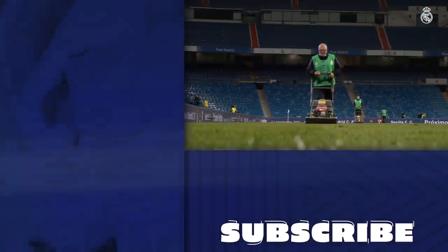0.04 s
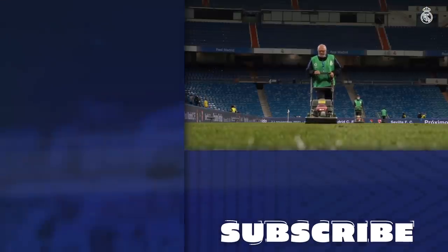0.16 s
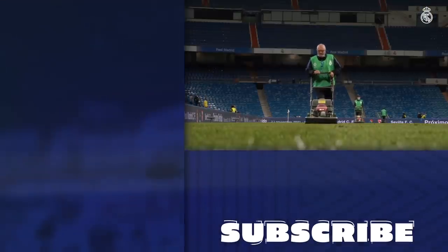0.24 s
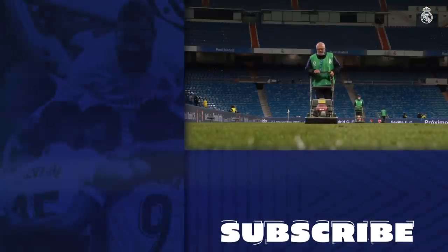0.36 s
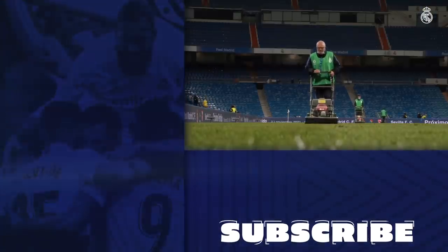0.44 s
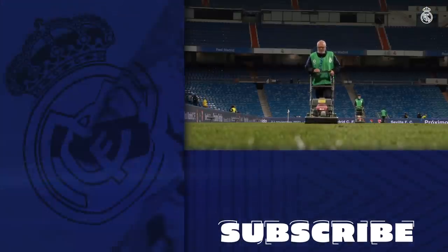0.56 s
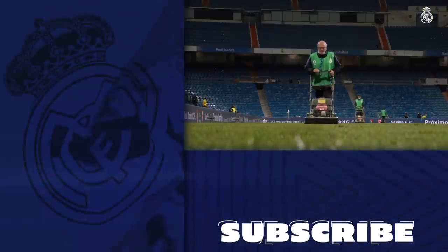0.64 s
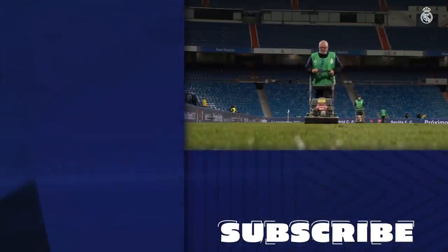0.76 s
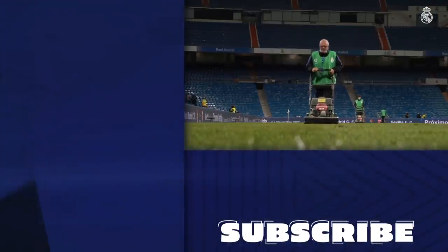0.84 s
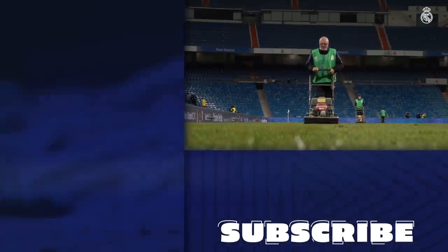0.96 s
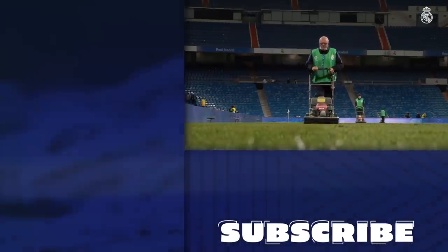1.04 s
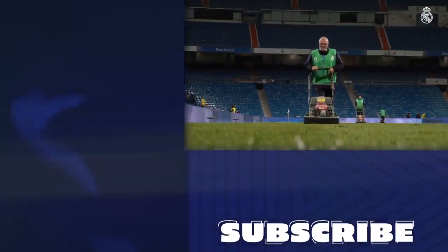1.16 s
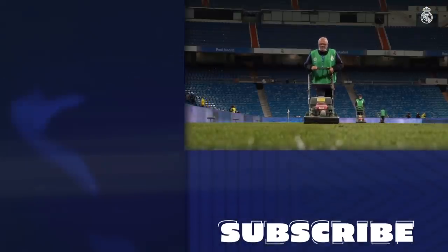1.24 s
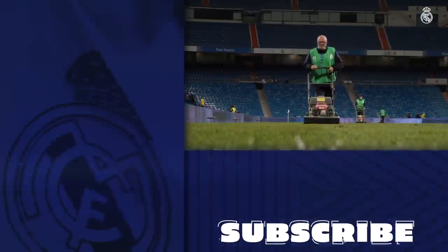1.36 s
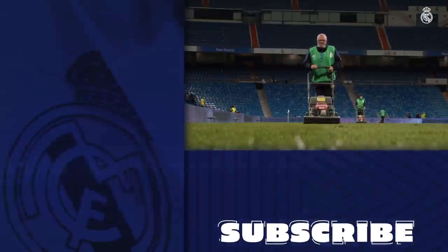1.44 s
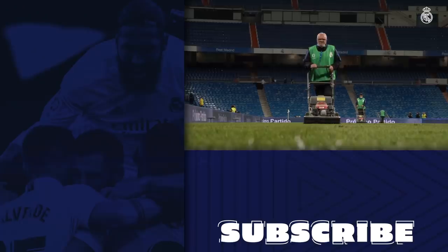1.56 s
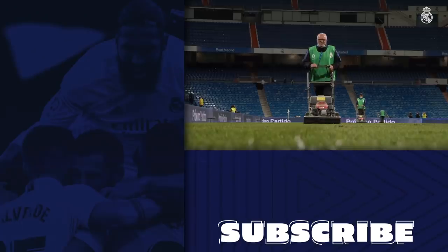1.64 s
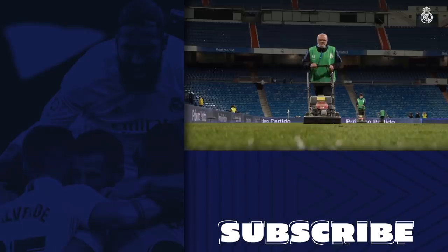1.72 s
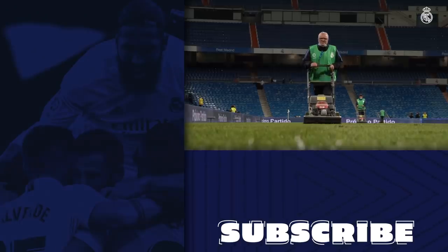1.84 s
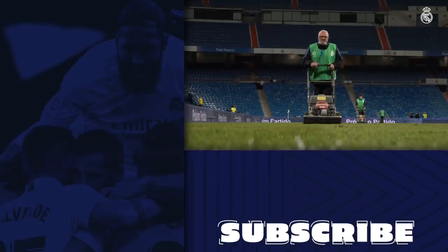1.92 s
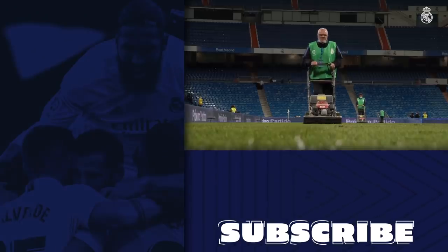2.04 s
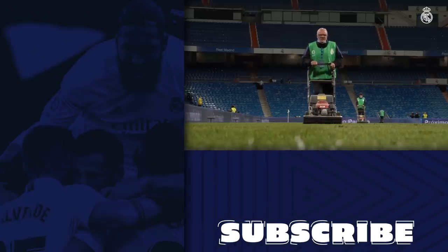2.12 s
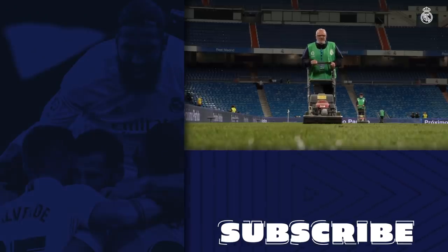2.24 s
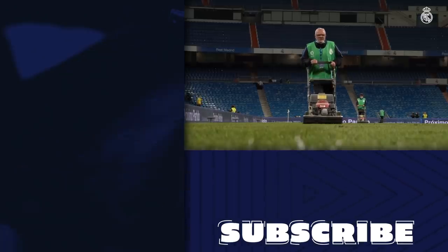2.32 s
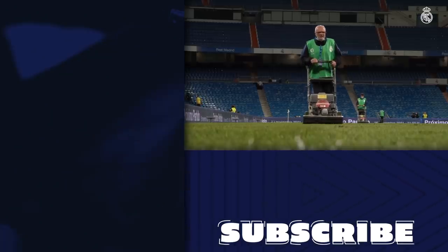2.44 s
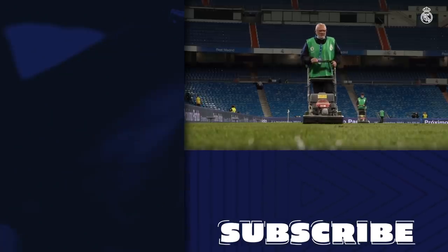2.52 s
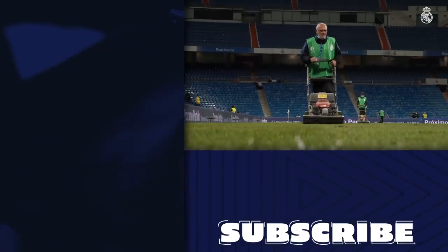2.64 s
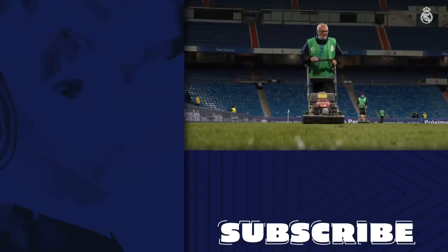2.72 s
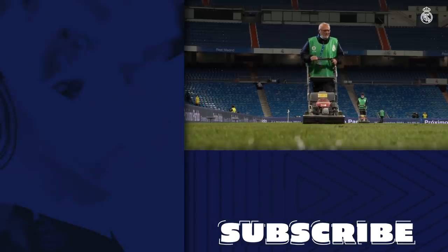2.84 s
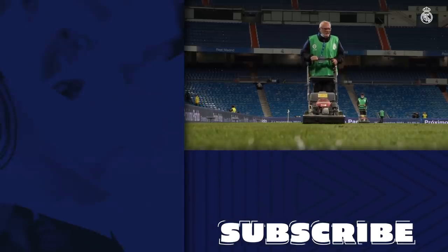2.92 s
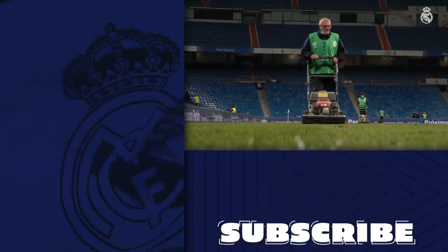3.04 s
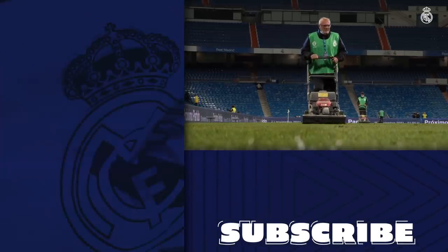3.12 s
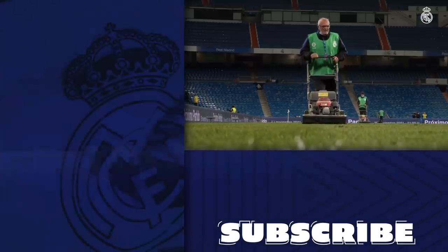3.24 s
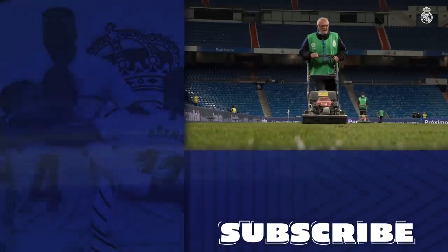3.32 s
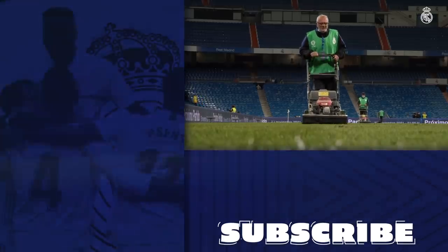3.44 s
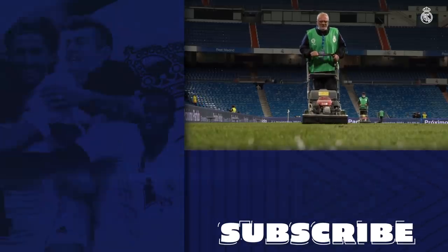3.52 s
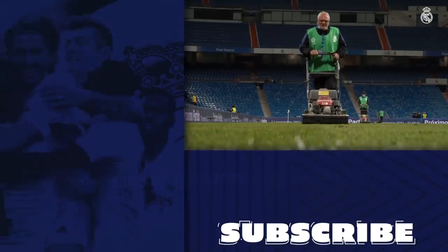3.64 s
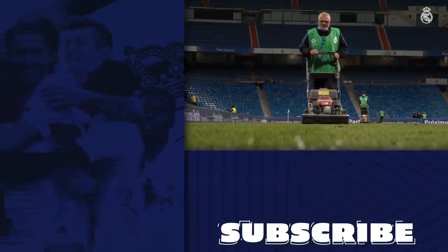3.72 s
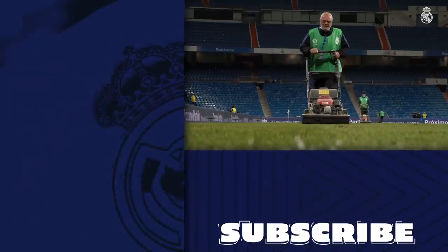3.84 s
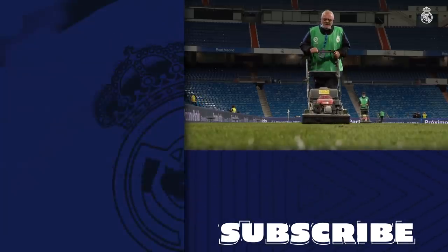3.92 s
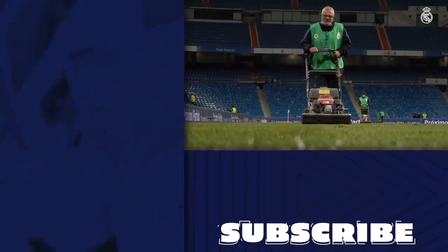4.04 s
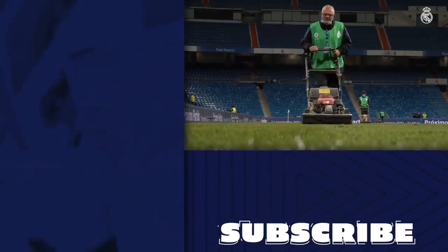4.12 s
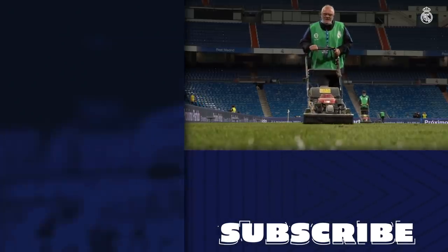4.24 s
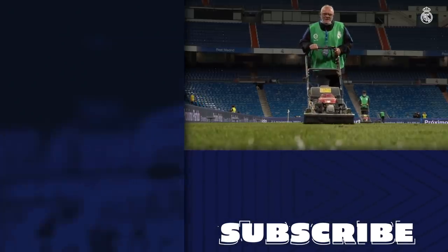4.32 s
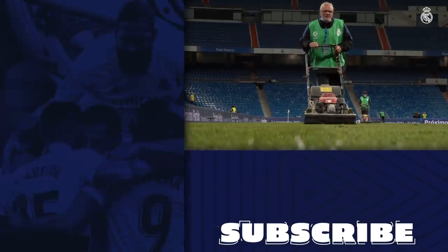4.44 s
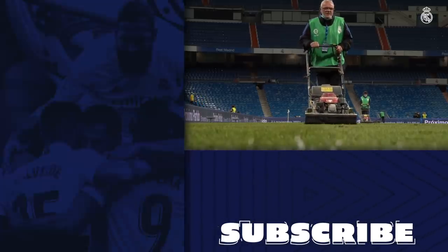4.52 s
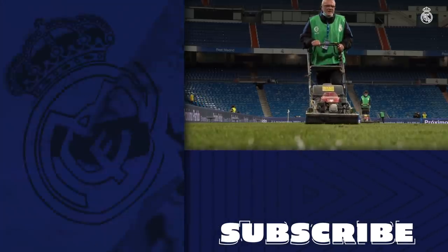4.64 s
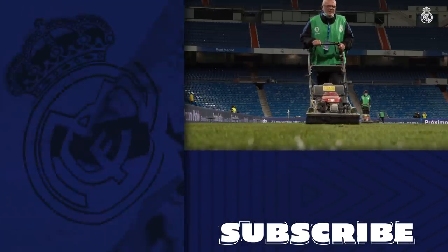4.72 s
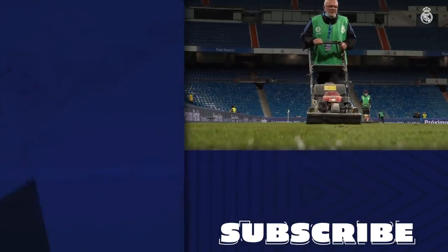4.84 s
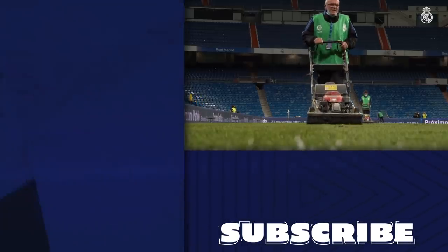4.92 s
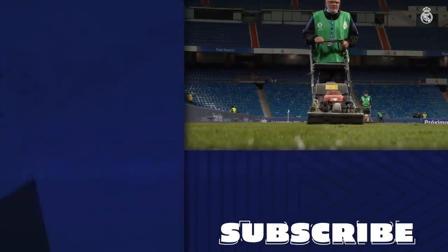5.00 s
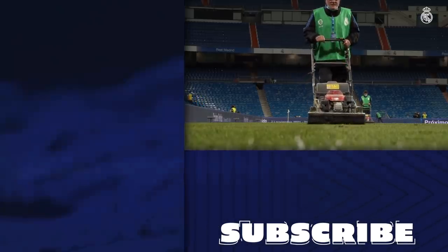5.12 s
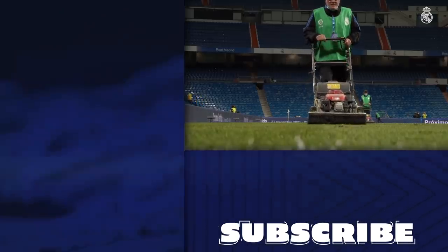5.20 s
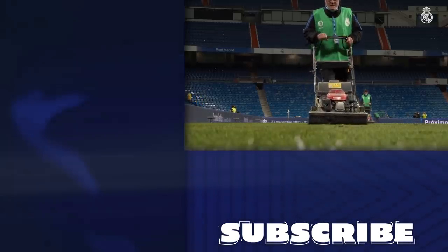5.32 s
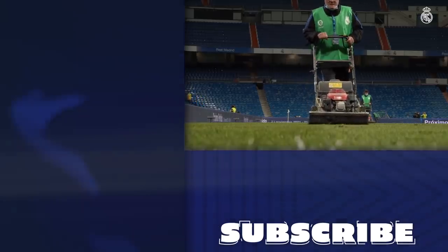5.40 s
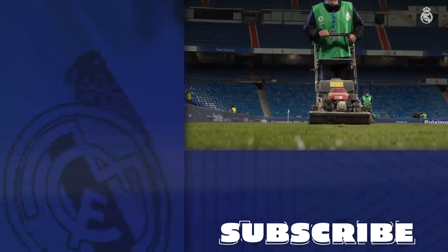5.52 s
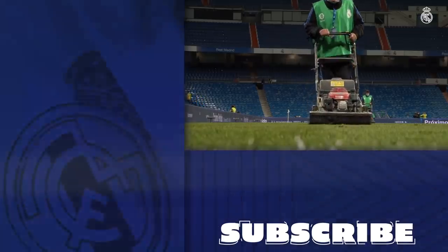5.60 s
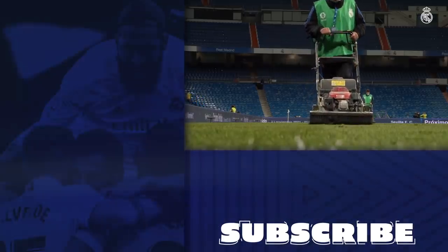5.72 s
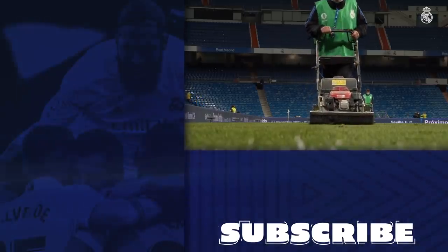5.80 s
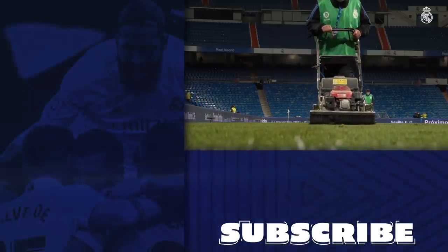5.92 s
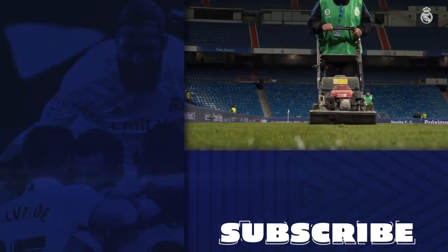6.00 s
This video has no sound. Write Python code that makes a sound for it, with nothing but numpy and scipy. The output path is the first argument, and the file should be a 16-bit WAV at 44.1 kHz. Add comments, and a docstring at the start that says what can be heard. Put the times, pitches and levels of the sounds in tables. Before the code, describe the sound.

A small one-cylinder lawn mower putters steadily across grass in a big empty stadium, slowly coming closer, with other mowers droning faintly far behind.

```python
"""A walk-behind mower with a one-cylinder four-stroke engine comes slowly nearer across the grass of an empty stadium.
Each firing sends a puff through the ringing muffler and a crack that washes off the seats; echoes from the stands
slide against the direct sound, so the low notes swell and fade.
Valves tick, gears whine in drifting tones, and shaped noise makes the rasp, the blade whir, the grass hiss and the fan.
Behind it, sine tones with slowly wandering level and pitch are the far mowers, over a low rumble."""
import sys
import numpy as np
from scipy import signal
from scipy.fft import rfft, irfft, next_fast_len
from scipy.io import wavfile

SR = 44100
rng = np.random.default_rng(int(sys.argv[2]) if len(sys.argv) > 2 else 0)


def to_wav(s):
    """Save 16-bit WAV."""
    ch = np.atleast_2d(s).T  # columns
    pcm = np.round(np.clip(ch, -1, 1) * 32767)  # PCM
    wavfile.write(sys.argv[1], SR, pcm.astype(np.int16))


N = 267378
LEAD = SR  # samples of running engine before the scene is heard
TIME = np.arange(-LEAD, N) / SR  # s
FIRING_HZ = 30.66  # typical firing rate
START_M, WALK_M_S, SOUND_M_S = 6.3, .56, 343  # distance at 0 s, walking speed, speed of sound
NEARNESS = START_M / (START_M - WALK_M_S * TIME)  # direct sound grows as one over the distance


def from_db(db):
    """Decibels to gain."""
    return 10 ** (np.asarray(db) / 20)


def rms_one(x):
    """Scale to rms 1."""
    return x / np.sqrt(np.mean(x ** 2) + 1e-20)


def approach(start_db, power):
    """Gain as the mower nears: power 1 for direct sound, less for echoes, more for sound the grass swallows."""
    return from_db(start_db) * NEARNESS ** power


def colour(x, spectrum):
    """Give x the shape of a spectrum, with sloping skirts beyond its ends; rms 1."""
    size = next_fast_len(len(x))
    hz, db = np.transpose(spectrum)
    log_hz = np.log(np.arange(size // 2 + 1) * SR / size + 1)
    beyond = np.abs(log_hz - np.clip(log_hz, np.log(hz[0]), np.log(hz[-1])))
    gain = from_db(np.interp(log_hz, np.log(hz), db) - 20 * beyond)
    return rms_one(irfft(rfft(x, size) * gain, size)[:len(x)])


def noise(spectrum):
    """Coloured noise, rms 1."""
    return colour(rng.standard_normal(len(TIME)), spectrum)


def drift(rate_hz):
    """Slow random wander with spread 1: smoothed noise drawn every 100 samples."""
    r = np.exp(-200 * np.pi * rate_hz / SR)
    chance = rng.standard_normal(len(TIME) // 100 + 2002)
    slow = signal.lfilter([1], [1, -2 * r, r * r], chance)[2000:]  # skip the settling
    return np.interp(np.arange(len(TIME)) / 100, np.arange(len(slow)), rms_one(slow))


def resonance(x, hz, width_hz):
    """Two-pole band-pass with gain 1 on top."""
    r = np.exp(-np.pi * width_hz / SR)
    feed = np.array([1, 0, -1]) * (1 - r * r) / 2
    back = [1, -2 * r * np.cos(2 * np.pi * hz / SR), r * r]
    return signal.lfilter(feed, back, x + 1e-18)


def strokes(cycles, place, uneven_db, jitter_s):
    """One click each firing cycle at the given place, uneven in strength and timing."""
    at = np.flatnonzero(np.diff(np.floor(cycles - place)) > 0)
    chance = rng.standard_normal((256, 2))[:len(at)]
    shift = (chance[:, 0] * jitter_s * SR).astype(int)
    clicks = np.zeros(len(TIME))
    clicks[np.clip(at + shift, 0, len(TIME) - 1)] = from_db(uneven_db * chance[:, 1])
    return clicks


def bursts(clicks, decay_s):
    """Each click starts an envelope that dies away exponentially."""
    return signal.lfilter([1], [1, -np.exp(-1 / (decay_s * SR))], clicks + 1e-18)


def seat_rows(x, t60_s):
    """Countless small reflections from the seats blur x into a wash; rms 1."""
    tail = rng.standard_normal(LEAD) * from_db(-60 * np.arange(LEAD) / SR / t60_s)
    return rms_one(signal.fftconvolve(x, tail)[:len(x)])


# low spectrum of the stadium: freq_hz, level_db
RUMBLE_SPECTRUM = [(15, -28), (28, 9.5), (42, -5), (56, 14), (80, 11), (130, 13.5), (210, 17), (300, 14.5),
                   (400, 10.5), (600, 7.5), (1500, -9.5)]


def rumble():
    """Low noise under everything, shaped by its spectrum."""
    return noise(RUMBLE_SPECTRUM)


# exhaust tones of the far mowers: firing_hz, multiple of the firing rate, level_db
FAR_TONES = [(32.98, 2, -44.5), (32.77, 4, -33), (32.4, 5, -58), (33.13, 6, -37.5), (32.83, 7, -35.5),
             (32.83, 12, -36.5), (34.9, 4, -38), (33.3, 5, -54), (33.74, 6, -59)]


def far_mowers():
    """Only the low exhaust notes carry across the pitch: sines wandering in level and phase."""
    drone = 0
    for firing_hz, multiple, level_db in FAR_TONES:
        level = from_db(level_db + 0.45 * drift(1.0))
        phase = 2 * np.pi * (multiple * firing_hz * TIME + rng.random()) + 0.7 * drift(0.33)
        drone = drone + level * np.sqrt(2) * np.sin(phase)
    return drone


# airy spectrum of the fan: freq_hz, level_db
FAN_SPECTRUM = [(2000, -24), (2700, 4.5), (3400, 7.5), (3880, 8.5), (4300, -11), (5000, -4), (8000, -5.5)]


def fan():
    """Steady air noise, strongest around 3 to 4 kHz."""
    return noise(FAN_SPECTRUM)


# spectrum of a swish through the grass: freq_hz, level_db
SWISH_SPECTRUM = [(2500, -7), (4500, -3), (6000, 5), (8000, -4), (11000, -20)]


def swish(at_s, width_s):
    """One brief brighter swish through the grass: noise under a bell-shaped envelope."""
    return np.exp(-.5 * ((TIME - at_s) / width_s) ** 2) * noise(SWISH_SPECTRUM)


# spectrum of the whirring blades: freq_hz, level_db
WHIR_SPECTRUM = [(1200, 6.5), (1750, 8), (1980, 9), (2300, -4.5), (2800, -15.5), (3600, -6), (5000, -18.5)]
# spectrum of the cut grass: freq_hz, level_db
HISS_SPECTRUM = [(2500, -10), (4500, 1), (6000, 0), (8000, -1.5), (9600, -3.5), (10500, -2), (12000, -7),
                 (15500, -12.5)]
# level the hiss settles towards, how far below that it is at 0 s, and how fast it emerges
HISS_NEAR_DB, HISS_LOST_DB, HISS_EMERGES_S = -55.5, 27, 1.52


def cutter():
    """The blades whir louder with every step; the hiss of cut grass emerges and levels off, with one swish."""
    whir = approach(start_db=-49.5, power=1.94) * noise(WHIR_SPECTRUM)
    hiss_db = HISS_NEAR_DB - HISS_LOST_DB * np.exp(-TIME / HISS_EMERGES_S)
    hiss = from_db(hiss_db) * noise(HISS_SPECTRUM)
    return whir + hiss + from_db(-56.5) * swish(at_s=2.63, width_s=0.085)


# spectrum of the close rasp: freq_hz, level_db
RASP_SPECTRUM = [(1600, -26), (2150, 6), (2450, 1), (2900, -5), (3500, -18), (5000, -20)]


def rasp(cycles):
    """Rough mechanical noise that pulses with the firings and only carries a short way."""
    shaking = bursts(strokes(cycles, place=.01, uneven_db=2.5, jitter_s=.0003), decay_s=.03)
    return colour(shaking * rng.standard_normal(len(TIME)), RASP_SPECTRUM)


# valve train contacts: place in the cycle (0-1), relative_level_db, decay_s
VALVE_CONTACTS = [(.012, 3, .003), (.214, -9, .0015), (.297, 1, .0015), (.342, -3, .0035), (.591, -2, .001)]
# bright spectrum of the ticks: freq_hz, level_db
TICK_SPECTRUM = [(1500, -10), (3500, 1), (6000, -1), (9000, -1), (10700, .5), (13000, -2.5), (15500, -5.5)]


def valves(cycles):
    """Metal contacts at fixed places in the cycle: bright ticks of decaying noise."""
    envelope = 0
    for place, level_db, decay_s in VALVE_CONTACTS:
        contacts = strokes(cycles, place, uneven_db=3.6, jitter_s=.00012)
        envelope = envelope + from_db(level_db) * bursts(contacts, decay_s)
    return colour(envelope * rng.standard_normal(len(TIME)), TICK_SPECTRUM)


# whine of the drive: multiple of the firing rate, relative_level_db
WHINE_TONES = [(16, -16), (18, -15.5), (20, -14.5), (23, -15), (24, -10.5), (26, -15), (28, -13.5),
               (34, -12.5), (37, -17.5), (38, -20.5), (48, -16), (51, -14.5), (82, -53), (126, -36.5)]
WHINE_FADES_HZ, WHINE_STEADY_SHARE = 1.84, .22  # rate of fading, direct share of the power


def whine(cycles):
    """Gear tones locked to the crank: a steady direct part plus scattered echoes that drift, so each tone fades."""
    tones = 0
    for multiple, level_db in WHINE_TONES:
        scattered = drift(WHINE_FADES_HZ) + 1j * drift(WHINE_FADES_HZ)
        paths = np.sqrt(2 * WHINE_STEADY_SHARE) + np.sqrt(1 - WHINE_STEADY_SHARE) * scattered
        turning = np.exp(2j * np.pi * (multiple * cycles + rng.random()))
        tones = tones + from_db(level_db) * np.real(paths * turning)
    return tones


# spectrum of the crack and rattle: freq_hz, level_db
CLATTER_SPECTRUM = [(250, 2), (420, -2), (680, 3.5), (900, 0), (1130, 3), (1320, -1.5), (1540, -4.5),
                    (1720, -12), (2200, -56), (3000, -28), (4200, -28), (5500, -59)]


def clatter(cycles):
    """The sharp crack of each firing, a rattle of the deck around it, and the crack's wash from the seats."""
    crack = colour(-strokes(cycles, place=.021, uneven_db=1.7, jitter_s=.00008), CLATTER_SPECTRUM)
    shaking = bursts(strokes(cycles, place=.97, uneven_db=1.8, jitter_s=.0002), decay_s=.021)
    rattle = colour(shaking * rng.standard_normal(len(TIME)), CLATTER_SPECTRUM)
    wash = seat_rows(crack, t60_s=2.03)
    return from_db(-9.0) * crack + from_db(-3.5) * rattle + from_db(-6.5) * wash


# slow swell of the boom: dB above and below the middle, period, time of a crest
SWELL_DB, SWELL_EVERY_S, SWELL_CREST_S = 2, 2.38, 3.5


def boom(cycles):
    """Fourth multiple of the firing rate, as an echo whose extra path grows at twice the walking speed."""
    swell = from_db(SWELL_DB * np.cos(2 * np.pi * (TIME - SWELL_CREST_S) / SWELL_EVERY_S))
    delay_s = .043 + 2 * WALK_M_S * TIME / SOUND_M_S
    late_cycles = cycles - FIRING_HZ * delay_s
    return swell * np.cos(2 * np.pi * 4 * late_cycles)


# muffler resonances: freq_hz, width_hz, level_db
MUFFLER_MODES = [(61.5, 3, -53), (154, 5.2, -35.5), (193.6, 29.5, -27), (272.8, 13.3, -35),
                 (304.4, 3.5, -35), (368.1, 8.9, -36.5), (598, 193, -50)]
# echoes from the stands: delay_s at 0 s, growth of the extra path in m/s, level_db
STAND_ECHOES = [(.04549, 1.119, -2.2), (.07433, .404, -5.2), (.09394, .01, -9), (.12702, 1.122, -2.2),
                (.15146, 1.122, -1.9), (.16778, 1.114, -1.9), (.21019, 0, -5.9)]


def exhaust(cycles):
    """Soft-edged puffs ring the muffler; the direct sound grows while the echoes slide later or stay put."""
    puffs = -strokes(cycles, place=.018, uneven_db=.6, jitter_s=.00006) * SR / (2 * FIRING_HZ)
    puffs = signal.sosfilt(signal.butter(4, 540, fs=SR, output="sos"), puffs)  # soften the edges
    note = sum(from_db(level_db) * resonance(puffs, hz, width_hz) for hz, width_hz, level_db in MUFFLER_MODES)
    echoes = 0
    for delay_s, growth_m_s, level_db in STAND_ECHOES:
        heard_from = TIME - delay_s - growth_m_s * TIME / SOUND_M_S
        echoes = echoes + from_db(level_db) * np.interp(heard_from, TIME, note)
    return NEARNESS * note + echoes


# nearly steady engine speed: time_s, firing_hz
ENGINE_SPEED = [(0.0, 30.588), (0.71, 30.75), (1.0, 30.658), (2.2, 30.614), (3.32, 30.75), (3.52, 30.666),
                (4.25, 30.792), (5.76, 30.458), (6.06, 30.642)]


def engine_cycles():
    """Add up the firing rate into a running count of firing cycles."""
    time_s, firing_hz = np.transpose(ENGINE_SPEED)
    cycles = np.cumsum(np.interp(TIME, time_s, firing_hz)) / SR
    return cycles - cycles[LEAD] - .79  # where in the cycle the scene opens


def scene():
    """The near mower, walked in at an even pace, over the drone of the stadium."""
    cycles = engine_cycles()
    stadium = far_mowers() + approach(start_db=-32.5, power=0.73) * rumble()
    air = approach(start_db=-59.0, power=0.53) * fan()
    metal = approach(start_db=-68.0, power=3.54) * rasp(cycles)
    ticks = approach(start_db=-63.6, power=1.35) * valves(cycles)
    engine = approach(start_db=-32.0, power=0.92) * (clatter(cycles) + from_db(-2.16) * whine(cycles))
    low_note = approach(start_db=-24.0, power=1.15) * boom(cycles)
    muffler = approach(start_db=-0.85, power=0.23) * exhaust(cycles)
    mix = stadium + air + cutter() + metal + ticks + engine + low_note + muffler
    return mix[None, LEAD:]


def record(dry):
    """Cut the top steeply above 15.75 kHz."""
    return signal.sosfilt(signal.ellip(12, .1, 80, 15750, fs=SR, output="sos"), dry)


dry = scene()
out = record(dry)
to_wav(out)
```